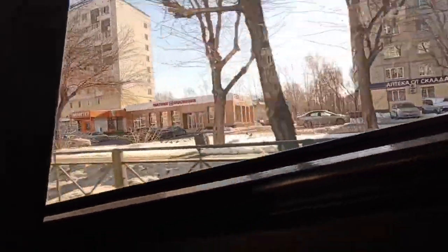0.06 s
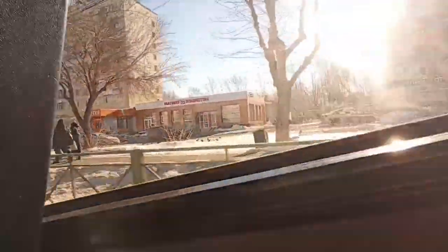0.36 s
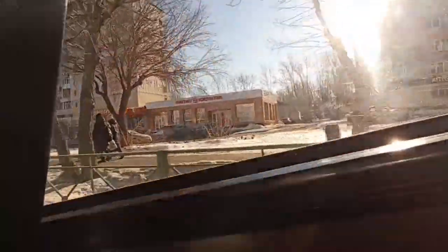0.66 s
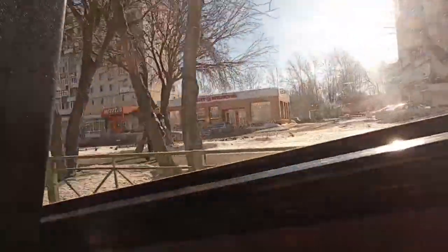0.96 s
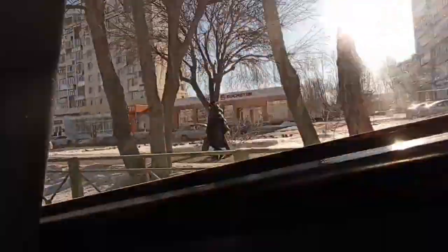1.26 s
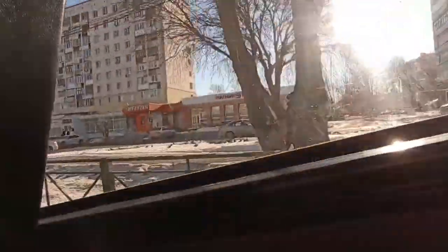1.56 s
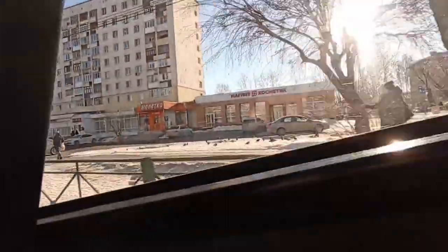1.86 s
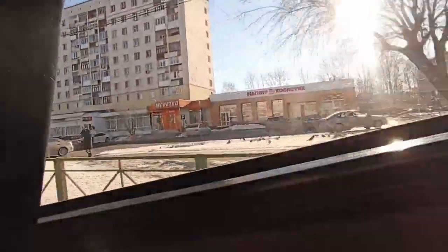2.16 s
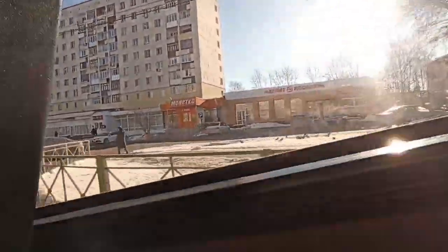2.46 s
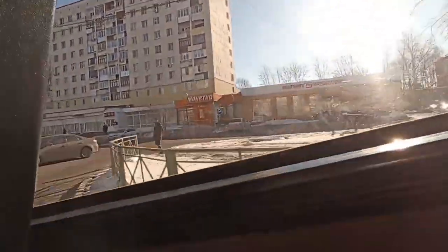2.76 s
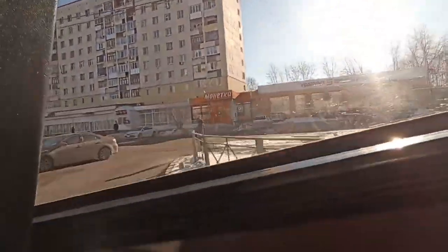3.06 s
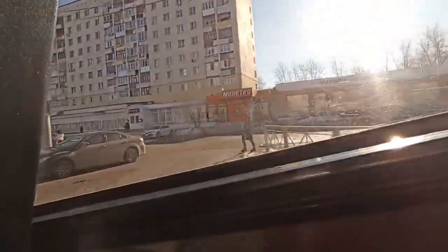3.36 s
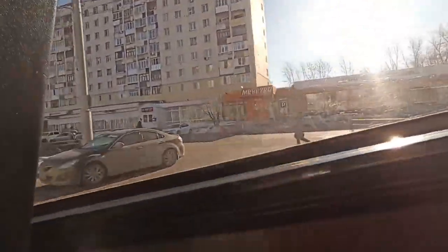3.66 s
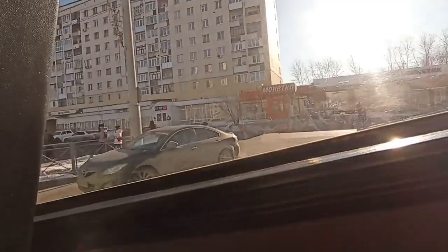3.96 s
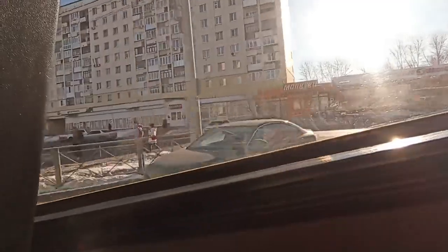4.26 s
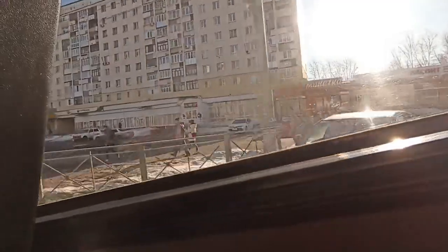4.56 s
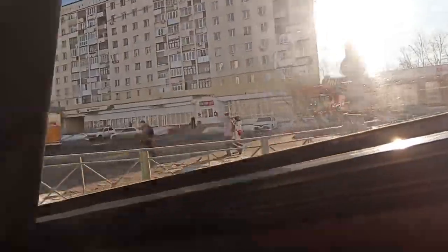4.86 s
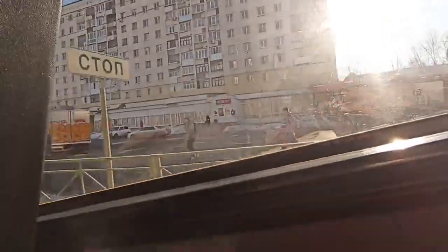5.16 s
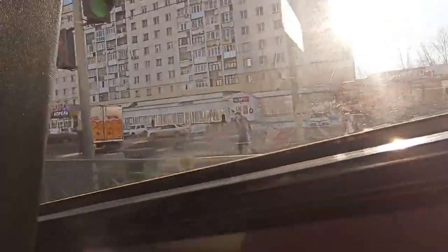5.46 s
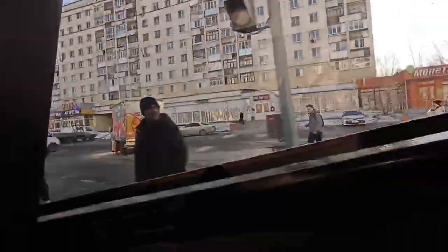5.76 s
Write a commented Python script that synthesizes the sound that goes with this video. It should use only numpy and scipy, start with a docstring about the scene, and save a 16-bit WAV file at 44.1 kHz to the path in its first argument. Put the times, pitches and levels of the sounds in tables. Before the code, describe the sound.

A city bus gathers speed with a booming drone, then cruises with an axle whine over tyre rumble, heard from inside.

```python
"""Inside a city bus

Heard by a closed window, the bus gathers speed with a booming drone, then cruises with an axle whine.
Engine, driveline and gears sound at orders (fixed multiples) of the shaft rate, over tyre rumble.
A faint turbo whistles, compressed air sighs out once, and loose trim ticks over the bumps."""
import sys
import numpy as np
from scipy import signal
from scipy.fft import rfft, irfft, next_fast_len
from scipy.io import wavfile

SR = 44100
rng = np.random.default_rng(int(sys.argv[2]) if len(sys.argv) > 2 else 0)


def dump(signal):
    """Clip the signal to [-1, 1] and save it as 16-bit WAV at the path in sys.argv[1]."""
    limited = np.clip(np.atleast_2d(signal).T, -1, 1)
    pcm = np.round(limited * 32767).astype(np.int16)
    wavfile.write(sys.argv[1], SR, pcm)


N = 265482
TIME = np.arange(N) / SR
FFT_SIZE = next_fast_len(N, True)
FREQS = np.maximum(np.fft.rfftfreq(FFT_SIZE, 1 / SR), 1)


def boom(turns):
    """Forced vibration: under load a belt-driven fan or compressor shakes the body panels and the cabin air
    booms."""
    # Envelopes of the boom and the drone. Each row: time in seconds, relative level in dB.
    boom_curve = [(0.02, -20.5), (0.04, -16), (0.53, -12.5), (0.56, -20), (0.65, -14), (0.7, -35),
                  (0.83, -9), (0.9, -23.5), (0.96, -7.5), (1.99, -19), (2.24, -9), (2.34, -24),
                  (2.39, -12.5), (2.52, -22), (2.54, -14.5), (2.7, -29.5)]
    drone_curve = [(0.0, -43), (0.068, -25.5), (0.616, -18), (0.82, -22.5), (0.84, -31.5), (0.934, -14.5),
                   (1.02, -41.5)]
    boom_order, drone_order = 4.45, 8  # the drone lies an octave under the axle whine
    boom_db = fading(boom_curve, fade_db_per_s=60, rest_db=-35.5) - 0.5
    drone_db = fading(drone_curve, fade_db_per_s=10, rest_db=-37.5) + 0.9
    boom_gain = wavering(boom_db, swing_db=.5, rate_hz=6)
    low = tone(boom_order * turns, rough=0.035, flutter_hz=14, pan_db=1.1)
    drone = tone(drone_order * turns, rough=.08, flutter_hz=13, spread=.2, pan_db=-0.4)
    return boom_gain * low + from_db(drone_db) * drone


def engine(turns, load, lull):
    """Periodic excitation: four diesel cylinders fire twice a turn, giving harmonics and pulsed clatter."""
    # Engine harmonics. Each entry: multiple of the crank rate; its level in dB pulling; and cruising.
    orders = [1, 2, 4, 6, 8, 14, 16, 34]
    pulling_db = [-42, -34, -30, -24, -31.5, -67, -37, -52.5]
    cruising_db = [-59.5, -28.5, -27.5, -41, -51, -34.5, -51.5, -64]
    # Clatter spectrum. Each row: frequency in Hz, relative density in dB.
    clatter_colour = [(1000, -18), (1900, -1.5), (2450, 1), (3300, -2), (3800, -7.5), (5400, -13),
                      (6100, -11.5), (6750, -13), (7100, -13.5), (8500, -18.5), (11000, -27),
                      (16000, -33.5)]
    crank = 1.075 * turns
    hum = 0
    for order, pulling, cruising in zip(orders, pulling_db, cruising_db):
        gain = from_db(load * pulling + (1 - load) * cruising)
        hum += gain * tone(order * crank, rough=.2, flutter_hz=8.1, spread=0.14, pan_db=3.0)
    firing = 1 + 0.051 * np.cos(4 * np.pi * crank) + 0.027 * np.cos(2 * np.pi * crank)
    clatter = wavering(-43 - 0.66 * load, swing_db=0.68, rate_hz=4) * firing * cabin_noise(clatter_colour)
    return lull * (hum + clatter)


def gears(turns, load, lull):
    """Gear meshing: the axle sings at tooth count times shaft rate, over a cluster of weaker lines."""
    # Envelope of the axle whine. Each row: time in seconds, relative level in dB.
    whine_curve = [(0.05, -36.5), (0.48, -30.5), (0.89, -46), (0.94, -35), (1.43, -41), (2.46, -22.5),
                   (4.39, -29.5), (4.5, -45), (4.62, -22), (4.72, -24.5), (4.75, -38), (4.9, -24),
                   (5.0, -28), (5.67, -26), (5.72, -33), (5.95, -35.5)]
    # Lines of gears and belt-driven parts. Each entry: multiple of the shaft rate; relative level in dB.
    orders = [5.73, 6.6, 7.15, 8.25, 10, 11.44, 13.1, 17.9, 19, 21, 22.9, 24, 27.9, 30, 30.75, 32, 33.3, 35,
              36.5, 42.08]
    levels_db = [-53.5, -36, -35, -36.5, -42, -42, -42.5, -44, -51.5, -54, -54, -56, -56, -56.5, -48.5, -59,
                 -70, -50.5, -53, -50]
    teeth = 16
    twist = .07 * drift(5)  # cycles: the shaft winds and unwinds, so the note wavers
    whine = tone(teeth * turns + twist, rough=0.22, flutter_hz=8.9, spread=1.23, pan_db=-2.5)
    cluster = 0
    for k, (order, db) in enumerate(zip(orders, levels_db)):
        spread = 0.046 * order * (-1) ** k  # shorter waves reach left and right further out of step
        cluster += from_db(db) * tone(order * turns, rough=0.23, flutter_hz=2.8, spread=spread, pan_db=2)
    # teeth pressed together under load sing and chatter less
    whine_gain = from_db(in_time(whine_curve) + 2.07 - 2.5 * load)
    cluster_gain = lull * from_db(0.16 - 1.1 * load)
    return whine_gain * whine + cluster_gain * cluster


def road(lull):
    """Transmission and resonance: tyres rumble via the floor, stir a cabin mode and roar through glass."""
    # Tyre noise spectra. Each row: frequency in Hz, relative density in dB.
    rumble_colour = [(20, -37.5), (40, -26.5), (56, -26.5), (68, -3), (95, -0.5), (115, -3.5), (165, -1.5),
                     (190, -5), (270, -3), (340, -5), (440, -5), (490, -10), (580, -9), (680, -22),
                     (1200, -67.5)]
    roar_colour = [(300, -12), (550, -1), (760, 1), (900, -2.5), (1150, -4), (1400, -6.5), (1650, -9),
                   (2000, -19), (3500, -30.5)]
    # Rough patches of road. Each row: start in seconds, peak level in dB.
    rough_patches = [(2.01, -36.5), (2.7, -42), (4.24, -48), (5.78, -41.5)]
    cabin_mode = rms_one(resonate(cabin_noise(rumble_colour), hz=133.0, width_hz=29))
    rumble = from_db(-24.5) * cabin_noise(rumble_colour) + from_db(-23.5) * cabin_mode
    surges = blows(rough_patches, rise_s=0.023, t60=0.4, tail_db=-25, tail_t60=.8)
    roar = (wavering(-35, swing_db=0.75, rate_hz=3.3) + surges) * cabin_noise(roar_colour)
    return lull ** 0.44 * rumble + lull * roar


def rattles():
    """Damped impacts: bumps thud through the body, the window knocks, loose trim ticks and buzzes."""
    # Blows to trim, window and wheels. Each row: start in seconds, relative peak level in dB.
    trim_ticks = [(2.564, -40), (4.667, -40), (4.677, -32), (4.686, -41), (4.704, -43), (4.757, -35),
                  (4.979, -39), (5.005, -25)]
    trim_buzzes = [(4.148, -50), (4.305, -51), (4.96, -51)]
    window_knocks = [(1.78, -39), (2.564, -36), (2.677, -30), (2.73, -37), (2.815, -30), (4.313, -40),
                     (5.796, -29), (5.842, -25.5)]
    wheel_bumps = [(3.22, -22), (5.766, -14.5), (5.872, -23.5)]
    # Their spectra. Each row: frequency in Hz, relative density in dB.
    trim_colour = [(2000, -26), (5500, -8), (8500, -10), (10200, 2), (13000, -3), (14500, -6), (16000, -15)]
    knock_colour = [(300, 11), (1800, 0), (3300, 3.5), (5000, -5), (9000, -5), (12000, -8.5), (16000, -12)]
    bump_colour = [(40, -33), (80, 0), (130, 8.5), (240, -1), (600, -10), (1200, -44), (3000, -59)]
    faint_ticks = [(start_s, -48) for start_s in rng.uniform(4.6, 4.7, 6)]
    ticks = blows(trim_ticks + faint_ticks, rise_s=.003, t60=.009, tail_db=-37, tail_t60=.12)
    buzzes = blows(trim_buzzes, rise_s=0.011, t60=0.15, tail_db=-30, tail_t60=.2)
    knocks = blows(window_knocks, rise_s=.002, t60=.028, tail_db=-19, tail_t60=.25)
    bumps = blows(wheel_bumps, rise_s=0.012, t60=0.25, tail_db=-11, tail_t60=.35)
    trim = (ticks + buzzes) * cabin_noise(trim_colour) * from_db([[0], [-4]])  # to the left
    return trim + knocks * cabin_noise(knock_colour) + bumps * cabin_noise(bump_colour)


def air_valve(lull):
    """Jet noise: compressed air blows off in stages and dies away to a faint steady hiss."""
    # Puffs as the valve opens. Each row: start in seconds, peak level in dB.
    puffs = [(1.73, -52), (1.945, -42), (2.02, -39)]
    # Hiss spectrum. Each row: frequency in Hz, relative density in dB.
    hiss_colour = [(500, -14), (1200, 2), (2500, 4), (4500, -2.5), (6400, 0.5), (7500, -1), (9500, -2),
                   (12500, -1), (16000, -5)]
    flow = blows(puffs, rise_s=0.017, t60=1.8, tail_db=-14.5, tail_t60=21) + lull * from_db(-65)
    return flow * wavering(0, swing_db=.5, rate_hz=25) * cabin_noise(hiss_colour)


def fittings():
    """Free vibration: each loose metal part rings at its own natural frequency."""
    # Clinks. Each row: start in seconds, frequency in Hz, peak level in dB, 60 dB decay time in seconds.
    clinks = [(2.47, 7400, -58, .25), (2.564, 5940, -43, 0.031), (2.566, 6850, -45, 0.028),
              (5.945, 2900, -51, .05)]
    out = 0
    for start_s, hz, db, t60 in clinks:
        envelope = blows([(start_s, db)], rise_s=0.0049, t60=t60, tail_db=-30, tail_t60=.1)
        out += envelope * tone(hz * TIME, rough=0.85, flutter_hz=84, spread=1.0)
    return out


def turbo():
    """Rotor tone: a thin whistle climbs as boost builds and fades once the bus is up to speed."""
    start_hz, rise_hz_per_s, top_hz = 6480, 930, 7950
    hz = np.minimum(start_hz + rise_hz_per_s * TIME, top_hz)
    gain = hump(middle_s=1.3, width_s=.9) * wavering(-66.5, swing_db=2.0, rate_hz=4)
    return gain * tone(np.cumsum(hz) / SR, rough=1.3, flutter_hz=70, spread=1.1, pan_db=7.5)


def cabin_noise(colour):
    """Diffuse field: unit-power noise, alike left and right in the bass, unrelated in the treble."""
    # Coherence of the cabin field. Each row: frequency in Hz, left-right correlation.
    coherence = [(60, 1), (130, 1), (290, 0.86), (450, 0.56), (700, 0.32), (1400, 0), (16000, 0)]
    alike, gain = over_hz(coherence), from_db(over_hz(colour))
    mid = filtered(rng.standard_normal(N), gain * np.sqrt(1 + alike))
    side = filtered(rng.standard_normal(N), gain * np.sqrt(1 - alike))
    return rms_one(np.array([mid + side, mid - side]))


def tone(cycles, rough, flutter_hz, spread=0, pan_db=0):
    """Random modulation: a line flutters in level and phase; left and right are spread radians apart."""
    flutter = 1 + rough * (drift(flutter_hz) + 1j * drift(flutter_hz))
    line = flutter * np.exp(2j * np.pi * (cycles + rng.random()))
    sides = np.array([[.5], [-.5]])
    return rms_one(np.real(line * np.exp(1j * spread * sides)) * from_db(pan_db * sides))


def resonate(x, hz, width_hz):
    """Resonance of one mode, with unit gain at its peak."""
    r = np.exp(-np.pi * width_hz / SR)
    feedback = [1, -2 * r * np.cos(2 * np.pi * hz / SR), r * r]
    return signal.lfilter(np.array([1, 0, -1]) * (1 - r * r) / 2, feedback, x)


def blows(events, rise_s, t60, tail_db, tail_t60):
    """Double-slope decay: each event's envelope rises, then falls with a faint tail."""
    out = np.zeros(N)
    for start_s, db in events:
        start = int(start_s * SR)
        age = TIME[:N - start]
        fall = from_db(-60 * age / t60) + from_db(tail_db - 60 * age / tail_t60)
        shape = (1 - np.exp(-(age / rise_s) ** 2)) * fall
        out[start:] += from_db(db) * shape / shape.max()
    return out


def fading(rows, fade_db_per_s, rest_db):
    """A dB curve that decays to a resting level after its last point."""
    end_s, end_db = rows[-1]
    sunk = np.maximum(end_db - fade_db_per_s * (TIME - end_s), rest_db)
    return np.where(TIME < end_s, in_time(rows), sunk)


def wavering(level_db, swing_db, rate_hz):
    """A gain that wanders about its level."""
    return from_db(level_db + swing_db * drift(rate_hz))


def drift(rate_hz):
    """Low-passed noise: a slow random wander of unit power."""
    hop, settle = 40, 2000
    r = np.exp(-2 * np.pi * hop * rate_hz / SR)
    noise = rng.standard_normal(N // hop + settle + 2)
    slow = signal.lfilter([1], [1, -2 * r, r * r], noise)[settle:]
    return np.interp(np.arange(N) / hop, np.arange(len(slow)), rms_one(slow))


def hump(middle_s, width_s):
    """A Gaussian rise to 1 and fall."""
    return np.exp(-((TIME - middle_s) / width_s) ** 2)


def in_time(rows):
    """A curve at every sample."""
    return np.interp(TIME, *np.transpose(rows))


def over_hz(rows):
    """A spectrum table at every frequency."""
    hz, value = np.transpose(rows)
    return np.interp(np.log(FREQS), np.log(hz), value)


def filtered(x, gain):
    """Apply a gain per frequency."""
    return irfft(rfft(x, FFT_SIZE) * gain, FFT_SIZE)[..., :N]


def from_db(db):
    """Decibels to gain."""
    return 10 ** (np.asarray(db) / 20)


def rms_one(x):
    """Scale to unit power."""
    return x / np.sqrt(np.mean(x ** 2) + 1e-20)


def scene():
    """Superposition: the sources add in the cabin, with engine, boom and gears locked to the shaft."""
    # Drive shaft speed. Each row: time in seconds, turns per second.
    shaft_speed = [(0.0, 28.81), (0.6, 29.86), (1.6, 31.97), (1.9, 32.72), (2.2, 33.19), (3.2, 33.52),
                   (4.7, 33.39), (5.5, 33.48), (6.02, 33.12)]
    # Throttle. Each row: time in seconds, load from 0 to 1.
    throttle = [(0, 0.76), (.5, 1), (1.3, 0.91), (1.7, 0.54), (2.2, 0.77), (2.7, 0.37), (6.02, 0.17)]
    turns = np.cumsum(in_time(shaft_speed)) / SR
    load = in_time(throttle)
    lull = from_db(-4.5 * hump(middle_s=1.346, width_s=0.23))  # the cabin noise sinks once and recovers
    drive = engine(turns, load, lull) + turbo() + boom(turns) + gears(turns, load, lull)
    return drive + road(lull) + air_valve(lull) + rattles() + fittings()


def record(dry):
    """Filtering and saturation: two microphone ports colour the sound, peaks round off, the top is cut."""
    # Port responses, the left ringing in the high treble. Each row: frequency in Hz, gain in dB.
    left_port = [(80, 0.17), (400, -1.5), (700, -0.14), (1300, -2), (2200, 1.5), (6500, -2), (8500, -6),
                 (10000, 0), (11400, 3), (11800, 7.5), (13000, 4), (14500, -1), (16000, 0)]
    right_port = [(80, 2.46), (400, 0.73), (700, 0.5), (1300, 1), (2200, 0.5), (5500, 0.5), (6750, 2.5),
                  (7100, -1), (8500, -4), (11300, -12), (11800, -8.5), (16000, -12.5)]
    headroom, cutoff_hz, fade_s = .8, 15750, .003
    picked_up = filtered(dry, from_db([over_hz(left_port), over_hz(right_port)]))
    rounded = picked_up / (1 + (picked_up / headroom) ** 8) ** (1 / 8)
    low_pass = 1 / np.sqrt(1 + (FREQS / cutoff_hz) ** 800)
    soft_ends = np.minimum(1, np.minimum(TIME, TIME[::-1]) / fade_s)
    return filtered(rounded * soft_ends, low_pass)


dry = scene()
out = record(dry)
dump(out)
```